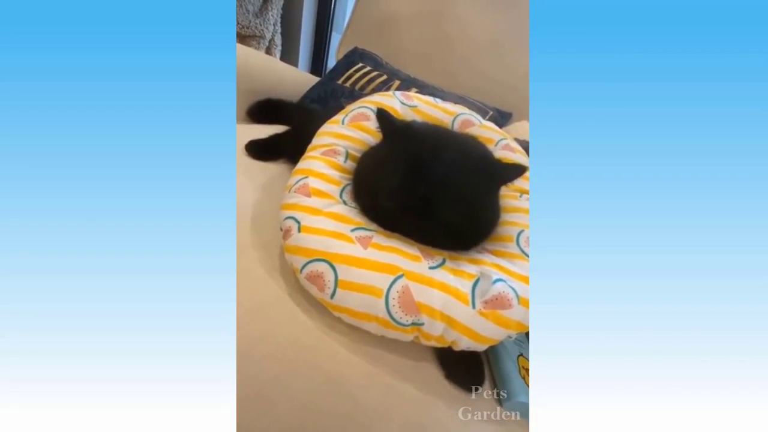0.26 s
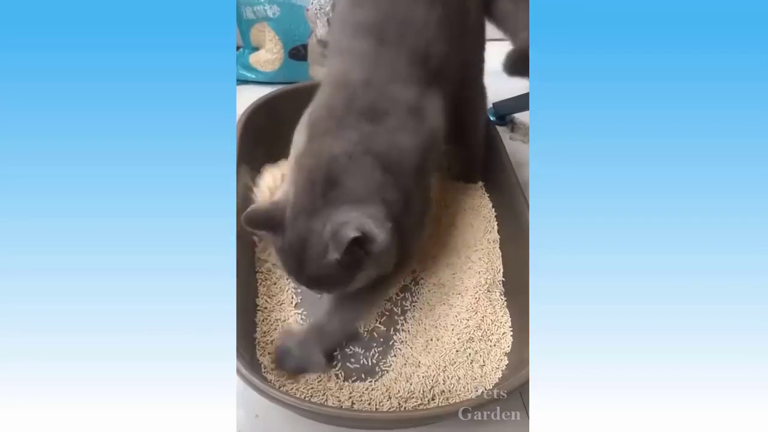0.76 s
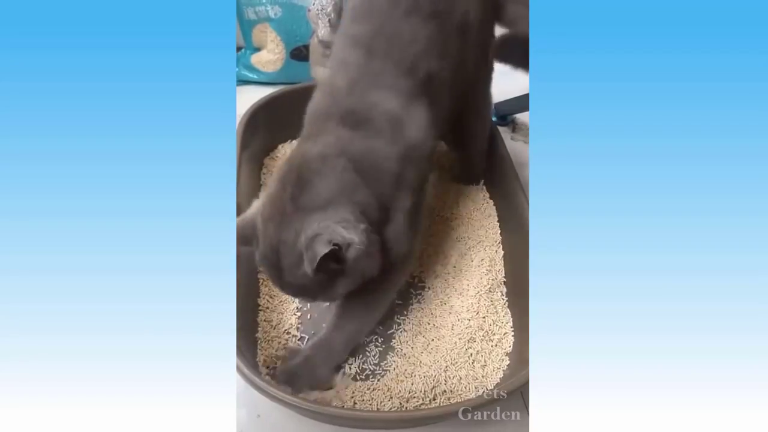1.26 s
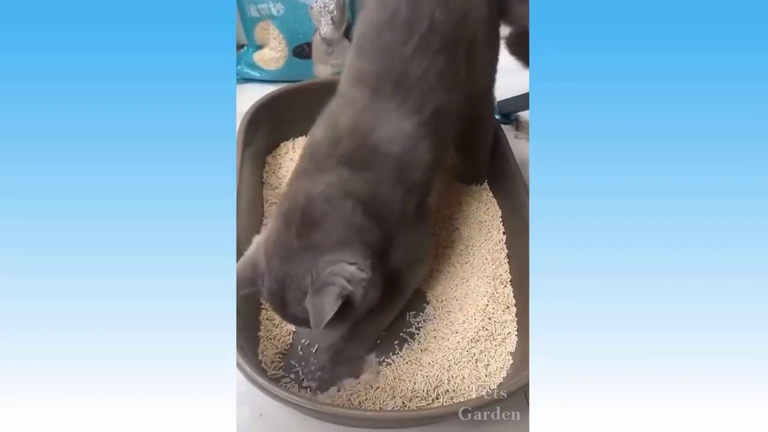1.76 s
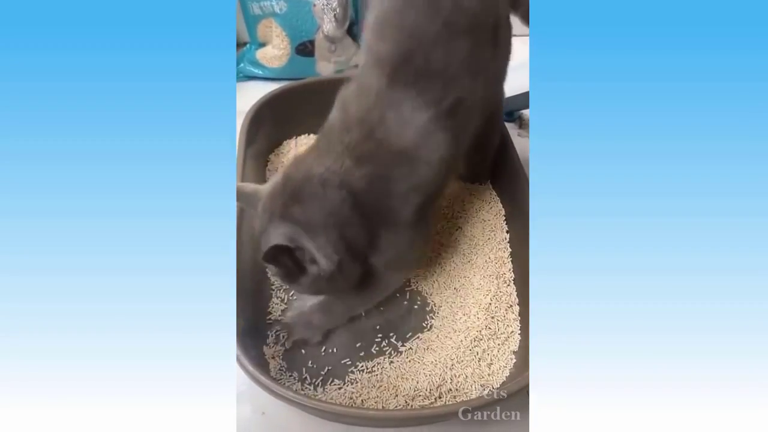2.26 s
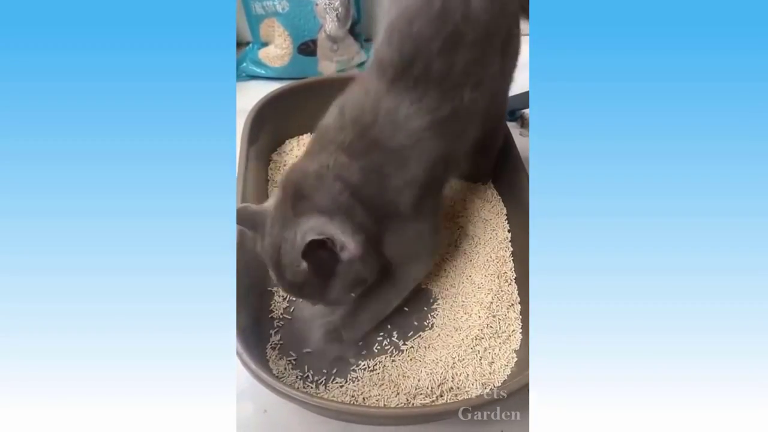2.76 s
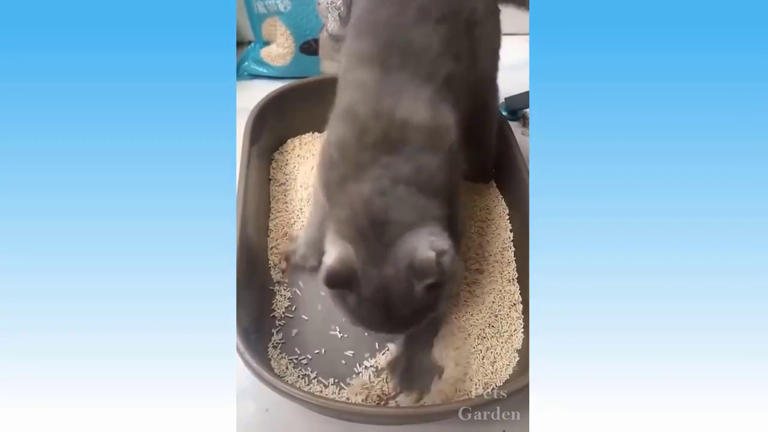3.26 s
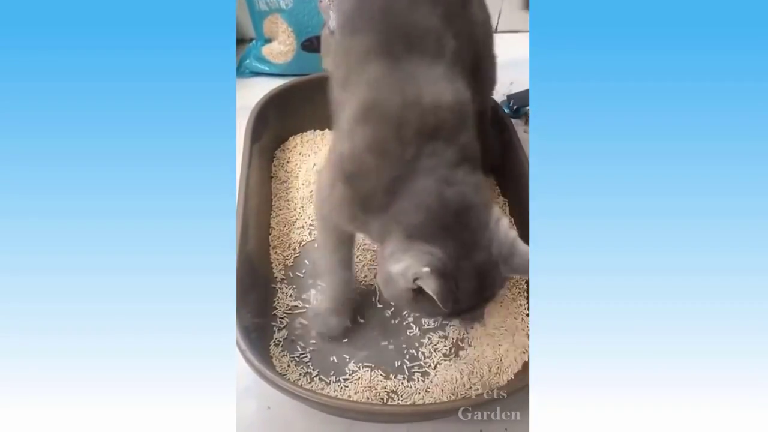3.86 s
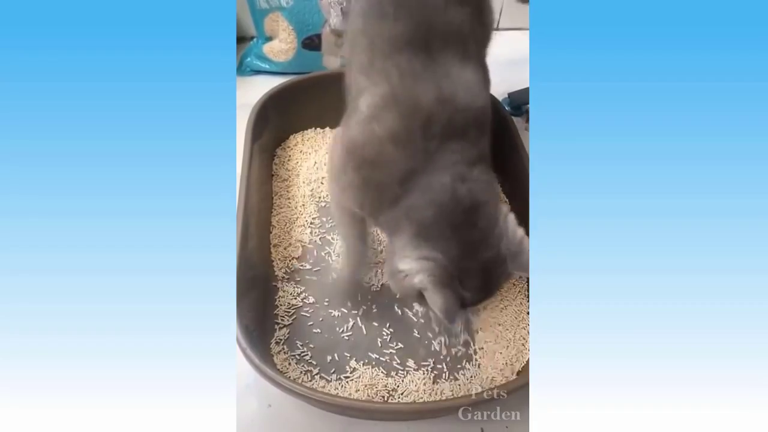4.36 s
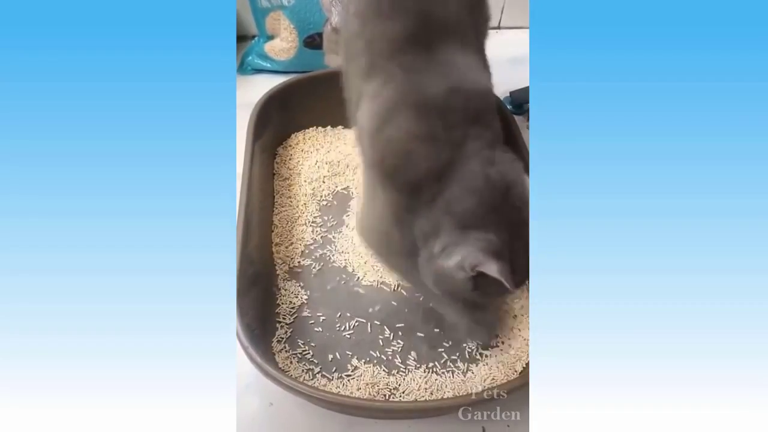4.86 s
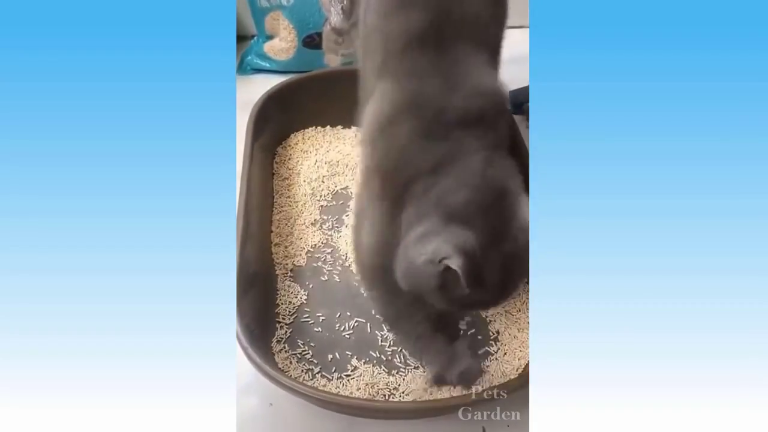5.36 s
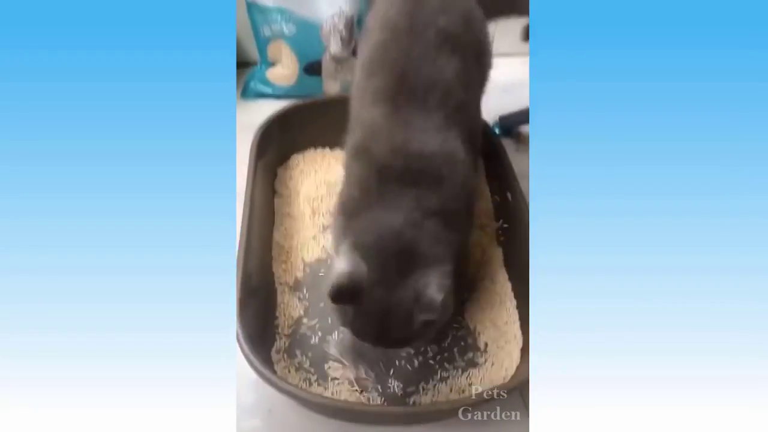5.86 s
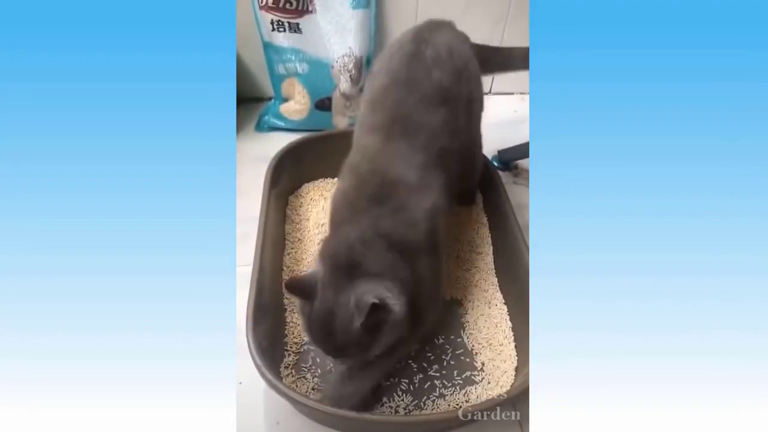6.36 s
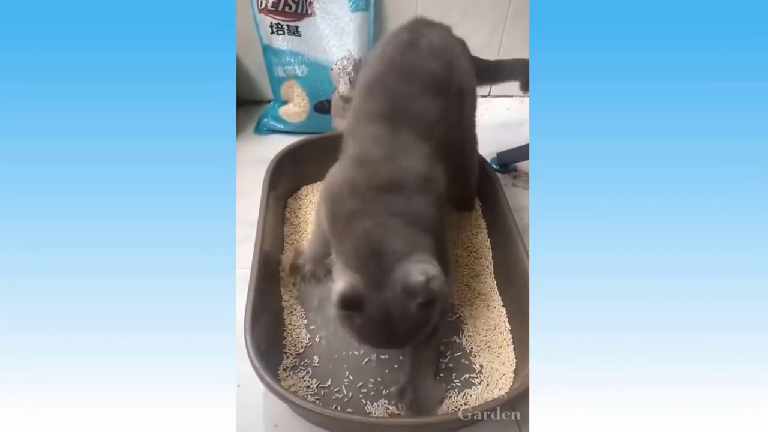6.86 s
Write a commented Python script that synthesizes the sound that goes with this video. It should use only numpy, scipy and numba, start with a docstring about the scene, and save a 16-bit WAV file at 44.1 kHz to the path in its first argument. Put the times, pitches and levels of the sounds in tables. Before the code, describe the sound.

After half a second of silence, a cat rakes pellet litter in a plastic tray up close, with rough clattering scrapes, gritty hiss and small knocks.

```python
"""In a small tiled room, a cat rakes pellet litter across a plastic tray, close to the microphone.
Pellets clack by the thousand under each stroke, each as a short dying tone; grit hisses as dense clicks.
The tray floor and body ring as sets of decaying tones, driven by dragged pellets, claws and thudding paws.
Flung pellets spatter on the wall in bursts of clicks, over a faint hush and a low rumble.
The sound cuts in after a silent half second."""
import sys
import numpy as np
from scipy import signal
from scipy.fft import rfft, irfft
from scipy.io import wavfile
from scipy.ndimage import uniform_filter1d
from numba import njit

SR = 44100
rng = np.random.default_rng(int(sys.argv[2]) if len(sys.argv) > 2 else 0)


def wav_out(sig):
    """Save sig, one row per channel (or a flat mono array), as 16-bit PCM at SR to the path in sys.argv[1]."""
    wavfile.write(sys.argv[1], SR, np.round(np.clip(np.atleast_2d(sig).T, -1, 1) * 32767).astype(np.int16))


N = 313992  # length in samples

# surges of litter, one to three in a paw stroke; swell and fade each span about 18 dB:
# peak_s, swell_s, fade_s, clatter_db (relative), then above or below the clatter: hollow_db,
# hollow_pitch_hz, tray_floor_db, coarse_grit_db, dust_db (over the coarse grit), tray_body_db
SURGES = [(0.57, 0.12, 0.064, -29.5, -6.5, 1860, -6, -5, -5, -16),
          (0.6, 0.056, 0.15, -37.5, 8.5, 1810, 0, -4, -9, -17),
          (0.82, 0.31, 0.27, -37, 4.5, 1770, -2, -6.5, -5, -9),
          (0.849, 0.067, 0.043, -28, -10, 1870, -18, -7, -6, -23),
          (1.037, 0.17, 0.06, -36, 2, 1850, -11, -3, 1, -18),
          (1.06, 0.064, 0.14, -28, 3.5, 1680, -2.5, -5, -6.5, -23),
          (1.222, 0.033, 0.07, -41, 8.5, 1760, -8, 2, -4, -11),
          (1.292, 0.054, 0.12, -32, 2, 1880, -18, -6, -7, -17),
          (1.335, 0.042, 0.18, -34, 7, 1950, -14, -6, -9, -21),
          (1.525, 0.075, 0.098, -28, 0, 1800, -4.5, -6, -4.5, -17),
          (1.77, 0.49, 0.34, -38, 5, 1790, -4, -8, -7, -16.5),
          (1.982, 0.077, 0.075, -33, 3, 1870, -11, -22, 4, -36),
          (2.07, 0.19, 0.13, -40, 7.5, 1850, 6.5, -2.5, -9, -12),
          (2.245, 0.26, 0.15, -37, 2, 1790, -12, -4, -6, -29),
          (2.337, 0.2, 0.28, -42, 7.5, 1800, -8, -10.5, -5, -10),
          (2.473, 0.038, 0.13, -28.5, 2.5, 1950, -12, -19, 0, -21),
          (2.596, 0.22, 0.057, -36, -8, 1820, -14, -0.5, -12, -33),
          (2.724, 0.3, 0.12, -40.5, 9, 1740, -1, -10.5, -10, -18),
          (2.783, 0.17, 0.094, -32.5, -3, 1910, -6, -8, -7, -14),
          (2.945, 0.048, 0.15, -29, 1, 1840, -13, -18.5, 1, -33),
          (3.052, 0.18, 0.095, -34, -10, 1840, -26, -2.5, -14, -36),
          (3.108, 0.04, 0.15, -40, -3, 2020, -3.5, -5, -12, -9.5),
          (3.26, 0.069, 0.05, -29.5, -4.5, 1910, -22, -10.5, -7, -27),
          (3.406, 0.13, 0.046, -32.5, 0, 1650, -16, -12, -1, -28),
          (3.518, 0.14, 0.075, -28, -8, 1820, -18, -5, -7.5, -11),
          (3.554, 0.26, 0.2, -36, 0, 2220, 0.5, -6, -6, -18),
          (3.651, 0.06, 0.13, -36.5, -4, 1770, -3, -4, -7, -5),
          (3.913, 0.091, 0.13, -32, -1.5, 1640, -14, -6.5, -5, -27),
          (3.931, 0.079, 0.22, -33, -0.5, 1550, -5, -6, -4, -10),
          (4.108, 0.064, 0.1, -31.5, 0.5, 1780, -2, -4.5, -7.5, -15),
          (4.171, 0.12, 0.11, -42, 9, 2000, 6, -1, -16, -5.5),
          (4.356, 0.067, 0.15, -28, -7.5, 1790, -20, -9.5, -5, -22),
          (4.43, 0.13, 0.38, -45, 15, 1860, 9, -6, -6, -8),
          (4.555, 0.087, 0.11, -29, 2.5, 1830, -2.5, -5, -9, -20),
          (4.665, 0.04, 0.1, -37, 0, 1740, 0, -3.5, -6, -3),
          (4.827, 0.051, 0.17, -30, -2, 2220, -17, -5, -6, -18),
          (4.89, 0.17, 0.2, -36, 3.5, 1860, 0, -15, -3, -19),
          (5.011, 0.12, 0.072, -30.5, -4, 2100, -10, -3, -6, -16),
          (5.099, 0.15, 0.09, -35, -3, 1750, 1, -5, -6, -9.5),
          (5.263, 0.085, 0.18, -31.5, 1, 1800, -10, -4.5, -5, -19.5),
          (5.331, 0.088, 0.065, -31, 8.5, 1610, 1, -14, -9, -28),
          (5.468, 0.08, 0.092, -29, -0.5, 2000, -6.5, -6.5, -4.5, -21),
          (5.5, 0.074, 0.28, -44.5, 5, 2200, 9, 2.5, -7, -3),
          (5.717, 0.082, 0.044, -24, -0.5, 1500, -10, -8.5, -2.5, -36),
          (5.85, 0.16, 0.1, -34.5, -4, 2100, -4, -4.5, -7, -15.5),
          (5.9, 0.055, 0.11, -29, 2, 1920, -8, -12.5, -1, -18),
          (5.953, 0.033, 0.35, -36, -4, 2170, -8, -4, -9, -9),
          (6.075, 0.057, 0.092, -29, 2.5, 1760, -22, -7.5, -6, -21),
          (6.126, 0.04, 0.13, -37.5, 6.5, 1980, 2, -8, -3.5, -19),
          (6.284, 0.083, 0.062, -26.5, -5, 2260, -14, -10.5, -8, -28),
          (6.329, 0.045, 0.11, -32, -8, 1630, -2.5, -4, -4, -30),
          (6.39, 0.04, 0.089, -39, 7, 1780, 2, -10, -10, -13),
          (6.482, 0.064, 0.28, -32.5, -5.5, 2040, -16, -8.5, -5, -17),
          (6.65, 0.046, 0.15, -34, -6, 2130, -13, -6, -7, -18),
          (6.701, 0.054, 0.17, -29, -6, 1660, -14, -14, -8, -36),
          (6.778, 0.13, 0.07, -41.5, -2, 2120, 3, 7, -12, -23),
          (6.934, 0.13, 0.16, -31, -4, 1850, -16, -10, -6.5, -16.5),
          (7.132, 0.11, 0.13, -29.5, 1, 1860, -5, -7, -3, -14)]
# paws landing on the tray: start_s, peak_db (relative), deep_part_db (over the peak)
PAW_THUDS = [(0.712, -33, -7), (1.197, -32.5, -16), (1.42, -40, -32), (1.64, -31.5, -15), (1.825, -45, -12),
             (2.066, -43, -21), (2.599, -46, -23), (3.113, -42.5, -21), (3.395, -42, -13),
             (3.648, -38, -15), (4.179, -32, -12), (4.43, -40, -9), (4.532, -59, -28), (4.891, -34, -9),
             (5.045, -43, -29), (5.778, -39, -9), (5.947, -45, 0), (6.171, -41, -12), (6.373, -44, -7),
             (6.576, -49, -9), (6.823, -42, -11), (7.019, -40.5, -1.5)]
# tones of the whole tray, the first two deep: pitch_hz, level_db (relative), t60_s (time to fall 60 dB)
BODY_TONES = [(96, 4, 0.2), (132, 11, 0.068), (229, -3, 0.071), (346.5, -1.5, 0.084), (404.5, 1, 0.048),
              (561, 1, 0.041), (638, -8.5, 0.3), (745, 3, 0.024)]
# tone colour of clacking pellets: frequency_hz, level_db (per Hz, relative)
CLATTER_COLOUR = [(350, -44), (600, -14), (750, -9.5), (1200, -1), (1600, -3.5), (2300, -3.5), (3000, -2),
                  (3800, -4.5), (4400, -7), (4900, -19.5), (6500, -20.5), (9000, -40), (12000, -39)]


def undb(db):
    """Turn decibels into a plain gain."""
    return 10 ** (np.asarray(db) / 20)


def level(x, db):
    """Scale a sound so that its average (RMS) level is db."""
    return x * undb(db) / np.sqrt(np.mean(x ** 2))


def highpass(x, hz):
    """Remove what lies below hz, steeply."""
    return signal.sosfilt(signal.butter(5, hz, "highpass", fs=SR, output="sos"), x)


def sweep(x, hz, width):
    """Keep a band around hz; filtering twice makes its edges steeper."""
    sos = signal.butter(1, [hz - width / 2, hz + width / 2], "bandpass", fs=SR, output="sos")
    return signal.sosfilt(sos, signal.sosfilt(sos, x))


def colour(x, points):
    """Shape the spectrum through the given points, with a filter that never responds early."""
    hz, db = np.transpose(points)
    grid = np.maximum(np.fft.rfftfreq(4096, 1 / SR), 1)
    gain = undb(np.interp(np.log(grid), np.log(hz), db))
    # folding the cepstrum (the transform of the log gain) onto positive times makes the filter causal
    cepstrum = irfft(np.log(gain))
    cepstrum[1:2048] *= 2
    cepstrum[2049:] = 0
    response = irfft(np.exp(rfft(cepstrum)))
    return signal.fftconvolve(x, response)[:N]


def ring(x, modes):
    """Plastic struck by x answers with several tones, each dying away at its own pace."""
    out = 0
    for hz, db, t60 in modes:
        pole = np.exp(2j * np.pi * hz / SR - np.log(1000) / (t60 * SR))
        out = out + undb(db) * signal.lfilter([1], [1, -pole], x).imag
    return out


def knocks(per_s, spread_db):
    """Random clicks of either sign, mostly small, a few large."""
    hit = rng.random(N) < per_s / SR
    return hit * rng.standard_normal(N) * undb(spread_db * rng.exponential(size=N))


def walk(rate):
    """Random levels, rate new ones a second, joined by slopes; their spread is near 1."""
    hold = int(SR / rate)
    steps = np.repeat(rng.standard_normal(N // hold + 1), hold)
    return 1.2 * uniform_filter1d(steps, hold)[:N]


def bursts(times, db, t60, rise_s):
    """Loudness curve of sudden bursts that die away by 60 dB in t60 seconds."""
    length = SR // 2
    since = np.arange(length) / SR
    env = np.zeros(N + length)
    shape = np.minimum(since / rise_s, 1) * undb(-60 * since / t60)
    for s, gain in zip(times, undb(db)):
        first = int(s * SR)
        env[first:first + length] += gain * shape
    return env[:N]


def strokes(db):
    """Loudness curve of the surges: a swell, a rounded top and a fade, summed in power."""
    rounding = 0.07  # rounded part of the top, as a share of swell or fade
    bend = 1.704  # above 1 a surge holds its top and then drops off steeply
    t = np.arange(0, N / SR + .01, .002)
    power = 0
    for (s, swell, fade, *_), peak in zip(SURGES, db):
        away = (t - s) / np.where(t < s, max(swell, .02), max(fade, .02))
        drop_db = 20 * (np.hypot(away, rounding) - rounding) ** bend
        power = power + undb(peak - drop_db) ** 2
    return np.interp(np.arange(N) / SR, t, np.sqrt(power))


@njit
def add(out, start, pole, size):
    """Add one dying sine per clack, followed down to about -50 dB."""
    for k in range(len(start)):
        z, i = size[k] + 0j, start[k]
        while abs(z) > .003 * abs(size[k]) and i < len(out):
            out[i] += z.imag
            z *= pole[k]
            i += 1
    return out


def clacks(start, hz, size, cycles):
    """Each clack rings at its own pitch and falls by 60 dB in the given number of cycles."""
    pole = np.exp((2j * np.pi - np.log(1000) / cycles) * hz / SR)
    return add(np.zeros(N), start, pole, size)


def sizes(hz, spread_db):
    """Mostly small, some large; high clacks are shorter, so each must be stronger."""
    return hz * undb(spread_db * np.minimum(rng.exponential(size=len(hz)), 4.5))


def background():
    """A faint room hush and a wavering low rumble, both made of filtered noise."""
    # tone colour of the hush: frequency_hz, level_db (per Hz, relative)
    hush_colour = [(53, -42), (90, -19), (113, -11), (161, -22), (211, -10), (265, -5.5), (337, 1.5),
                   (476, 1), (700, 8), (910, -43), (1540, -120)]
    # far machinery in the building: centre_hz, width_hz, level_db
    rumble_bands = [(34, 10, -81), (58.8, 23.5, -60.5)]
    out = level(colour(rng.standard_normal(N), hush_colour), -58.5)
    for hz, width, db in rumble_bands:
        out = out + level(sweep(rng.standard_normal(N), hz, width), db)
    return out


def room(x, t60=0.065, wet_db=-12):
    """Tiled walls close by smear every clack with a short, dull tail."""
    t = np.arange(int(t60 * SR)) / SR
    tail = rng.standard_normal(len(t)) * undb(-60 * t / t60) * (t > .003)
    tail = signal.lfilter([1], [1, -.3], tail)  # dulls the treble
    tail = tail / np.sqrt(np.sum(tail ** 2))
    return x + undb(wet_db) * signal.fftconvolve(x, tail)[:N]


def thuds():
    """A soft paw pushes the tray for a moment and settles; the deep tones take their own share."""
    s, db, deep_db = np.transpose(PAW_THUDS)
    push = rng.standard_normal(N) * bursts(s, db, 0.061, 0.0052)
    high = ring(push, BODY_TONES[2:])
    deep = ring(bursts(s, db + deep_db, 0.015, 0.002), BODY_TONES[:2])
    # a thin tray radiates little deep bass
    return highpass(undb(-24.0) * high, 188) + highpass(undb(-36) * deep, 86)


def tray():
    """Pellets and claws dragged over the plastic ring its floor and, faintly, its whole body."""
    # claws catch the bare tray floor: start_s, level_db (relative)
    claw_catches = [(0.708, -20.5), (1.456, -25), (1.827, -38), (2.339, -24), (3.855, -30), (4.171, -45),
                    (4.892, -33), (5.221, -24), (5.449, -24), (5.966, -23.5), (6.190, -29), (6.308, -25),
                    (6.376, -35), (6.589, -18), (6.732, -18), (6.828, -19.5), (6.961, -35), (7.040, -24)]
    # tones of the tray floor: pitch_hz, level_db (relative), t60_s
    floor_tones = [(870, -13, .05), (960, -11, .05), (1050, -9, .05), (1125, -6, .06), (1175, -3, .09),
                   (1235, 0, .11), (1305, -4, .08)]
    _, _, _, clatter_db, _, _, floor_db, _, _, body_db = np.transpose(SURGES)
    claw_s, claw_db = np.transpose(claw_catches)
    drag = strokes(clatter_db + floor_db) + bursts(claw_s, claw_db, t60=0.076, rise_s=0.004)
    # the body rattles on after a thud
    s, thud_db, _ = np.transpose(PAW_THUDS)
    shake = strokes(clatter_db + body_db) + bursts(s, thud_db - 8, t60=0.24, rise_s=0.0033)
    floor_hits = drag * undb(2 * walk(20)) * knocks(5000, 1.7)
    floor = highpass(ring(floor_hits, floor_tones), 836)
    body_hits = shake * undb(2 * walk(12)) * knocks(1500, 1.0)
    body = highpass(ring(body_hits, BODY_TONES[2:]), 228)
    return level(floor, -38.0) + level(body, -52)


def hard_knocks():
    """A pellet or claw snaps against the plastic: a ring at its pitch and two brief, sharper overtones."""
    # single hard knocks: start_s, peak_db (relative), pitch_hz
    single_knocks = [(0.87, -15.5, 1700), (1.051, -21, 1500), (1.09, -19, 1790), (1.518, -21, 1840),
                     (1.824, -24, 2290), (1.828, -13, 2050), (2.342, -16.5, 2030), (2.465, -17.5, 2080),
                     (2.785, -17, 2530), (3.649, -26, 1140), (3.923, -20, 1500), (4.176, -18.5, 1106),
                     (4.842, -33, 1930), (4.893, -17, 1153), (5.302, -28, 1600), (5.315, -22, 1480),
                     (5.337, -14.5, 1480), (5.549, -20.5, 1203), (5.72, -33, 1470), (6.306, -13.5, 1333),
                     (6.736, -22, 1330)]
    s, db, hz = np.transpose(single_knocks)
    start = (s * SR).astype(np.int64)
    body = clacks(start, hz, undb(db - 2.5), cycles=61.0)
    snap = clacks(start, 1.7 * hz, undb(db - 7), cycles=10.)
    snap = snap + clacks(start, 2.9 * hz, undb(db - 10), cycles=8.)
    return highpass(body + snap, 530)


def grit():
    """Crumbs and dust scratch: very dense, tiny clicks."""
    # tone colour of grit: frequency_hz, level_db (per Hz, relative)
    grit_colour = [(2900, -13.5), (5000, 0), (5500, 0), (6650, -2.5), (7600, -6), (8700, -5),
                   (10400, -10.5), (11400, -7), (12800, -5.5), (13800, -9), (14900, -4.5), (15800, -18.5)]
    return level(colour(knocks(12000, 0.17), grit_colour), 0)


def spatter():
    """Handfuls of pellets strike the wall: a burst of clicks and a flash of grit, the finest fading soonest."""
    # flung pellets, levels relative: start_s, peak_db, bright_part_db, finest_grit_db (over the bright part)
    flung_handfuls = [(0.703, -17, -41, -2), (0.958, -15.5, -43, 0), (0.998, -41, -37.5, -6),
                      (1.197, -18, -44, -2), (1.425, -24, -39, 4), (1.614, -29, -42.5, -3),
                      (1.641, -13.5, -40, -10), (1.822, -8.5, -37.5, -7), (2.061, -30, -48, 5),
                      (2.341, -20, -47, 1), (2.931, -21, -46, 3), (3.644, -12.5, -44, 0),
                      (3.897, -39, -38, 10), (4.173, -10, -40, -3), (4.427, -10, -40.5, -1),
                      (4.55, -19, -36, -6), (4.89, -13, -44, -3), (5.548, -17, -45, -2),
                      (5.779, -17, -38.5, -2), (6.183, -22, -38.5, 1), (6.372, -12.5, -42, 0),
                      (6.589, -22.5, -47.5, -3), (6.823, -13, -43, -2), (7.012, -13.5, -42, -2)]
    when, peak_db, bright_db, fine_db = np.transpose(flung_handfuls)
    flung = level(colour(knocks(11000, 2.0), CLATTER_COLOUR), -11.5)
    flash = bursts(when, bright_db, 0.11, 0.002) * level(grit(), 7.2)
    fine_grit = level(highpass(grit(), 8500), 2.8)
    fine = bursts(when, bright_db + fine_db, 0.093, 0.0018) * fine_grit
    return bursts(when, peak_db, 0.094, 0.0016) * flung + flash + fine


def scratch():
    """Coarse grit and fine dust flicker apart from each other as the paw drags."""
    _, _, _, clatter_db, _, _, _, grit_db, dust_db, _ = np.transpose(SURGES)
    dust = level(highpass(grit(), 9700), -0.98)
    lowpass = signal.butter(5, 10400, fs=SR, output="sos")
    coarse = level(signal.sosfilt(lowpass, grit()), -1.07)
    coarse = coarse * strokes(clatter_db + grit_db) * undb(1.5 * walk(25))
    dust = dust * strokes(clatter_db + grit_db + dust_db) * undb(1.5 * walk(20))
    return coarse + dust


def pellets():
    """Loose pellets clack at any pitch; those in the hollow keep near its pitch; both slide in clumps."""
    s, _, _, clatter_db, hollow_db, hollow_hz, *_ = np.transpose(SURGES)
    start = rng.integers(0, N, 36000)
    hz = 780 * 2 ** (3.62 * rng.random(len(start)))  # spread over 3.62 octaves
    loose = clacks(start, hz, sizes(hz, 0.66), cycles=39.0)
    loose = level(colour(loose, CLATTER_COLOUR), 0.66)
    loose = loose * strokes(clatter_db) * undb(1.5 * walk(25))
    start = rng.integers(0, N, 12000)
    # the hollow's pitch glides from surge to surge
    hz = np.interp(start / SR, s, hollow_hz) * 2 ** (0.2 * rng.standard_normal(len(start)))
    near = clacks(start, hz, sizes(hz, 2.9), cycles=17.0)
    near = level(highpass(near, 984), -3)
    return loose + near * strokes(clatter_db + hollow_db) * undb(1.5 * walk(30))


def scene():
    """Litter, tray and paws sound in the tiled room, over the background."""
    litter = pellets() + scratch() + spatter() + hard_knocks()
    return (room(litter + tray() + thuds()) + background())[None]


def record(dry):
    """Silence until the sound cuts in; faint self-noise; steep cut at the top."""
    start_s, top_hz = .52, 15600
    noisy = dry + undb(-66) * rng.standard_normal(dry.shape)
    cut = noisy * (np.arange(N) >= start_s * SR)
    steep = signal.ellip(12, .2, 80, top_hz, fs=SR, output="sos")
    return signal.sosfilt(steep, cut)


dry = scene()
out = record(dry)
wav_out(out)
```